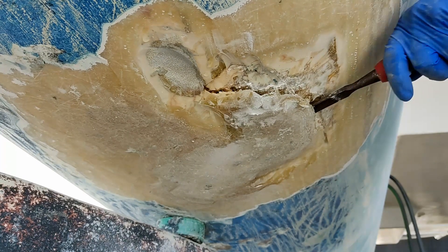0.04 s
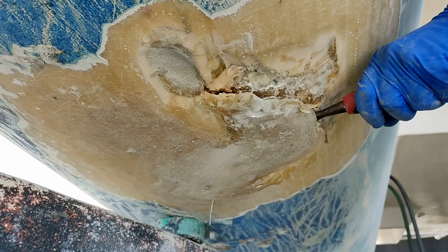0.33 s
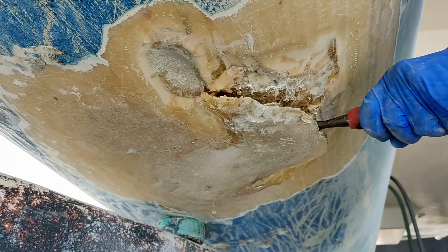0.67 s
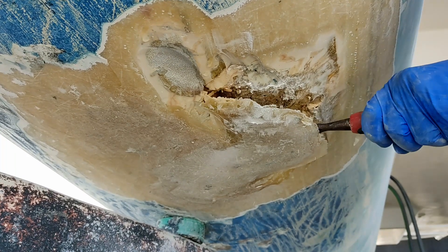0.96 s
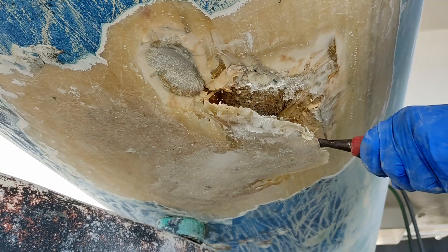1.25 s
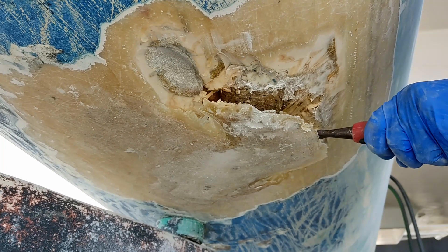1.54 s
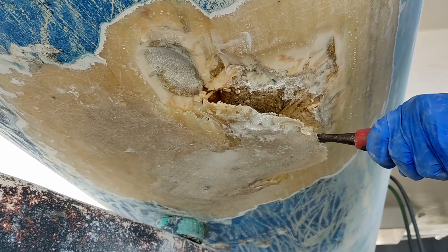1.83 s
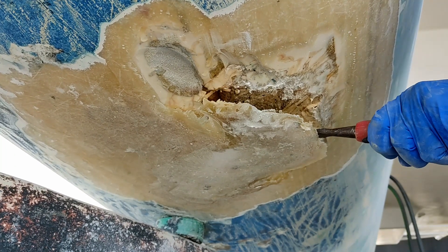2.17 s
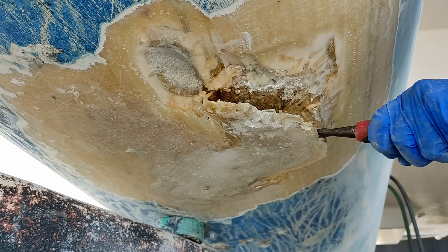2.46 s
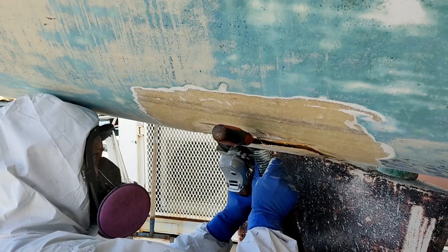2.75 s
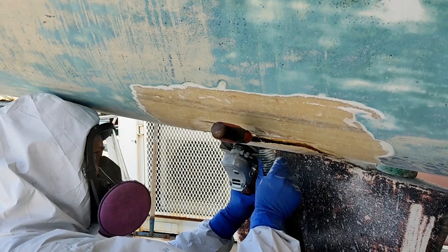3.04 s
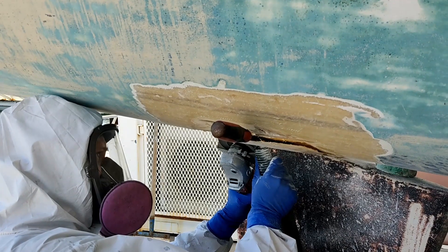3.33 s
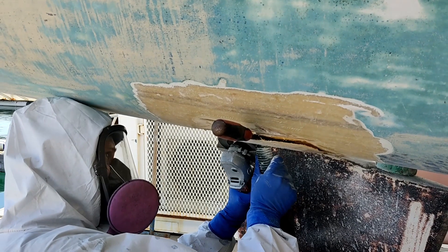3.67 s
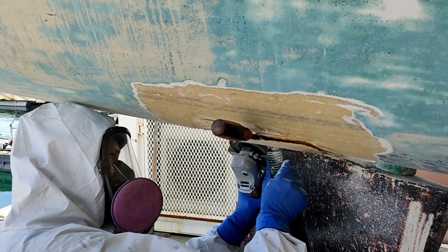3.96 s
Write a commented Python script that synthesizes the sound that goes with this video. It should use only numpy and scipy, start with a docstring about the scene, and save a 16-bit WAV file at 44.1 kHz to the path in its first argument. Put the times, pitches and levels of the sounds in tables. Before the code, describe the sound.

Sharp snaps of fibreglass prised off a boat hull, followed by a rasping, whining grinder.

```python
"""A boatyard, microphone close to the hull. A chisel prises off brittle glass-fibre laminate:
a tear, small snaps, three loud breaks. The cracks ring the hull panel, echo in the yard and overload
the recorder; air buffets the microphone. After a short silence an angle grinder sands the hull,
slowing and whining as it is pressed on."""
import sys
import numpy as np
from scipy import signal
from scipy.fft import rfft, irfft, next_fast_len
from scipy.io import wavfile
from scipy.ndimage import uniform_filter1d, map_coordinates

SR = 44100
rng = np.random.default_rng(int(sys.argv[2]) if len(sys.argv) > 2 else 0)


def transcribe(signal):
    """Save signal, clipped to [-1, 1], as a 16-bit WAV file at the path in sys.argv[1]."""
    frames = np.atleast_2d(signal).T
    limited = np.clip(frames, -1, 1)
    pcm = np.round(limited * 32767).astype(np.int16)
    wavfile.write(sys.argv[1], SR, pcm)


N = 176400
T = np.arange(N) / SR
FFT_SIZE = next_fast_len(N + SR)
HZ = np.fft.rfftfreq(FFT_SIZE, 1 / SR)

# spectra of a fracture and of its splinters (frequency [Hz], gain [dB])
FRACTURE = [(60, -30.5), (250, -13.5), (800, -29.5), (1250, -0.5), (1700, 0.5), (2500, -0.5), (3500, -2),
            (5000, -3), (7000, -14.5), (15000, -36)]
SPLINTERS = [(1000, -36), (3500, 0.5), (5500, 3.5), (8300, -0.5), (10000, -9), (12000, -6), (15500, -11.5)]
# the grinding disc, slower under load (time [s], speed [turns/s])
DISC_SPEED = [(2.57, 168.5), (2.78, 160.3), (2.9, 159), (2.98, 156.6), (3.16, 147.6), (3.25, 144.8),
              (3.33, 146), (3.48, 151.7), (3.55, 153.4), (3.62, 153.9), (3.72, 152.5), (3.82, 149.8),
              (4, 146.5)]


def amp(db):
    """Decibels to gain."""
    return 10 ** (np.asarray(db) / 20)


def unit(x):
    """Scale to rms 1."""
    return x / np.sqrt(np.mean(np.abs(x) ** 2) + 1e-20)


def along(points, hz):
    """Interpolate (frequency, value) points on a log frequency axis."""
    freqs, values = np.transpose(points)
    return np.interp(np.log(hz + 1), np.log(freqs + 1), values)


def curves(rows):
    """One value per sample for each column after the time."""
    times, *columns = np.transpose(rows)
    return [np.interp(T, times, column) for column in columns]


def wobble(rate):
    """A smooth random curve, rate knots a second."""
    coarse = T[::16]
    knots = rng.standard_normal(int(N * rate / SR) + 4)
    return np.interp(T, coarse, map_coordinates(knots, [coarse * rate]))


def filtered(x, response):
    """x through a frequency response."""
    return irfft(rfft(x, FFT_SIZE) * response, FFT_SIZE)[:N]


def colour(points):
    """Causal response of unit power from (frequency [Hz], gain [dB]) points."""
    cepstrum = irfft(np.log(amp(along(points, HZ))), FFT_SIZE)
    cepstrum[1:FFT_SIZE // 2] *= 2
    cepstrum[FFT_SIZE // 2 + 1:] = 0
    return unit(np.exp(rfft(cepstrum)))


def modes(rows):
    """Causal response of unit power from resonances."""
    return unit(sum(amp(db) * 1j * HZ * width / (hz * hz - HZ ** 2 + 1j * HZ * width)
                    for hz, width, db in rows))


def noise(points):
    """Coloured noise of rms 1."""
    return unit(filtered(rng.standard_normal(N), colour(points)))


def grains(rate, spread_db):
    """Random tiny clicks of uneven size, rate a second, rms 1."""
    size = amp(spread_db * np.clip(rng.standard_normal(N), -2, 2))
    return unit((rng.random(N) < rate / SR) * size * rng.choice([-1, 1], N))


def tones(turns, orders, jitter, flutter_db):
    """Slightly unsteady lines on whole multiples of a shaft speed."""
    return unit(sum(amp(db + flutter_db * wobble(14))
                    * np.sin(2 * np.pi * round(k) * turns + jitter * wobble(60)) for k, db in orders))


def add(track, start, x):
    """Mix x into the track at start seconds."""
    part = track[round(start * SR):][:len(x)]
    part += x[:len(part)]


def yard_ambience():
    """The bed of the yard: a low, wavering noise and a faint hiss."""
    # spectra (frequency [Hz], gain [dB])
    air_colour = [(60, -21.5), (135, -1), (165, -7), (270, -5.5), (400, -10.5), (800, -18), (1600, -23.5),
                  (8000, -53)]
    hiss_colour = [(400, -24.5), (1200, -1.5), (3500, 2.5), (7000, -2), (10000, -8.5), (15000, -13)]
    # background treble (time [s], level [dB])
    hiss_levels = [(.5, -58.5), (1.15, -58), (1.27, -66), (1.7, -62.5), (2.1, -67.5), (2.2, -50.5),
                   (2.45, -52)]
    air = amp(-46 + 2.5 * wobble(5)) * noise(air_colour)
    return air + amp(curves(hiss_levels)[0]) * noise(hiss_colour)


def mic_buffet():
    """Moving air rumbles on the microphone."""
    # gusts (time [s], level [dB])
    gusts = [(0, -38.5), (.33, -23), (.5, -35), (1.3, -31), (1.75, -37), (1.95, -19), (2.15, -43.5),
             (2.4, -34.5), (2.7, -60)]
    # their spectrum (frequency [Hz], gain [dB])
    gust_colour = [(6, 9.5), (25, -5), (100, -23), (250, -39.5), (1000, -96.5)]
    return amp(curves(gusts)[0]) * noise(gust_colour)


def laminate_snaps(jolt=0.59, energy_s=0.0023):
    """Each snap is a jolt and a quick run of micro-fractures; fibres crackle and the panel rings."""
    # snaps (time [s], level [dB], t60 [s], relative panel ring [dB], relative splinter treble [dB])
    snaps = [(0.081, -52.5, .012, -13, 6.5), (0.193, -17, 0.016, 4, -3), (0.203, -29.5, 0.011, 14.5, 0),
             (0.215, -24, .006, 4, -4), (.223, -18.5, 0.0037, 4.5, -0.5), (0.268, -32.5, 0.0064, 3, -13),
             (0.694, -22, 0.0076, -21, -20), (.698, -15.5, 0.0085, -15, -10),
             (.730, -21.5, 0.014, -13, -9.5), (.793, -26.5, 0.0038, -28, -12),
             (0.8437, -17.5, 0.004, -35, -11), (0.85, -19.5, 0.073, -15, -6.5),
             (0.9662, -8, 0.006, -17, -11), (0.9688, -2.5, 0.017, -8, -3.5), (.985, -4.5, 0.012, 4.5, -8.5),
             (.997, -20, 0.0096, 8.5, -4.5), (1.009, -18, .006, -12, -7.5),
             (1.029, -20.5, 0.0067, -12, -1.5), (1.350, -21.5, 0.01, -8.5, 7.5),
             (1.353, 3, 0.019, 1, -16.5), (1.359, -13, 0.015, 14, -16), (1.371, -17.5, 0.0071, 12.5, -6),
             (1.387, -22.5, .012, -1.5, 2), (1.392, -3.5, 0.031, -9, -4.5), (1.790, -16.5, 0.0067, 5, -17),
             (1.8193, -11, 0.019, 1.5, -21), (1.822, -15, 0.015, -25, 5), (1.8314, -13, 0.026, -3.5, -12),
             (1.8427, -14.5, .008, -8, -3), (1.849, -17, 0.053, -13, -2.5),
             (1.948, -42.5, 0.0068, -21, 7.5)]
    # showers of parting fibres (time [s], t60 [s], level [dB])
    showers = [(.65, 0.29, -41), (.81, 0.27, -34), (.845, 0.056, -27.5), (.945, 0.24, -30.5),
               (.988, 0.15, -21), (1.326, 0.32, -31), (1.365, 0.15, -23.5), (1.78, 0.13, -20.5),
               (1.81, 0.4, -26.5)]
    # hull panel modes (frequency [Hz], width [Hz], gain [dB])
    panel_modes = [(227, 110, -20.5), (508, 53, -3), (660, 180, -8), (1000, 90, 0), (1093, 240, 5),
                   (1300, 140, -4.5), (1310, 57, -3), (1560, 61, 2.5), (1700, 110, -7.5),
                   (2780, 250, -10.5)]
    fracture, panel, splinters = colour(FRACTURE), modes(panel_modes), colour(SPLINTERS)
    n = SR // 8
    out, t = np.zeros(N), np.arange(n) / SR
    kernels = [irfft(response, FFT_SIZE)[:n] for response in (fracture, panel, splinters)]
    for start, db, t60, ring_db, treble_db in snaps:
        run = rng.standard_normal(n) * rng.exponential(1, n) * amp(-60 * t / t60)
        run /= np.linalg.norm(run)
        run[0] += jolt
        for kernel, part_db in zip(kernels, (0, ring_db, treble_db)):
            part = signal.fftconvolve(run, kernel)[:n]
            # as much energy as this level held for energy_s
            add(out, start, amp(db + part_db) * np.sqrt(energy_s * SR) * part / np.linalg.norm(part))
    shower_level = np.zeros(N)
    for start, t60, db in showers:
        age = np.maximum(T - start, 0)
        rise = np.minimum(age / (0.036 * t60), 1)
        shower_level += rise * amp(db - 60 * age / t60)
    fibres = shower_level * grains(rate=3000, spread_db=7)
    body = unit(fracture + amp(0.5) * panel + amp(-6.5) * splinters)
    return out + filtered(fibres, body)


def yard_echo(x):
    """Close reflections off the hull, and the longer echo of the yard."""
    # decay of the yard (frequency [Hz], t60 [s])
    decay = [(150, 0.68), (1500, 0.68), (5000, 0.63), (9000, 0.42), (15000, 0.83)]
    hz, t, spectrum = signal.stft(rng.standard_normal(SR), SR, nperseg=256)
    tail = signal.istft(spectrum * amp(-60 * t / along(decay, hz)[:, None]), SR, nperseg=256)[1]
    close = grains(rate=2900, spread_db=5) * amp(-60 * T / 0.078) * (T > .002)
    return sum(amp(db) * signal.fftconvolve(x, echo / np.linalg.norm(echo))[:N]
               for echo, db in ((tail, -22.5), (close, -12)))


def fibre_ticks(t60=0.0066):
    """Fibres part with thin, bright ticks: a fine crackle under strain, and a few stray ones."""
    # splintering before the first break, and stray ticks (time [s], relative level [dB])
    strain = [(.5, -69), (.54, -52.5), (.6, -63.5), (.68, -56.5), (.77, -57.5), (.86, -52), (.96, -47)]
    strays = [(.116, -42), (0.741, -37), (1.283, -44.5), (1.479, -41)]
    straining = (T > strain[0][0]) * (T < strain[-1][0])
    out = amp(curves(strain)[0]) * grains(rate=230, spread_db=6.5) * straining
    t = np.arange(SR // 50) / SR
    for start, db in strays:
        add(out, start, 2 * amp(db - 60 * t / t60) * rng.standard_normal(len(t)))
    return filtered(out, colour(SPLINTERS) + .5 * colour(FRACTURE))


def tear(slip_hz=1060, slip_scatter=.19):
    """The flap first rips loose: fibres part in a dense run while it sticks and slips at its own pitch."""
    # course of the rip (time [s], relative level [dB])
    rip = [(.118, -41), (.133, -39), (.14, -22.5), (.151, -31.5), (.158, -22), (.174, -17.5), (.181, -37.5),
           (.187, -27), (.194, -16), (.212, -12.5), (.228, -23), (.265, -31), (.282, -40)]
    # spectrum of the parting fibres (frequency [Hz], gain [dB])
    rip_colour = [(100, -14), (260, 1.5), (480, -5), (800, -1.5), (1500, -10.5), (3100, -14.5), (3800, -21),
                  (8500, -18.5), (10000, -25), (12000, -16.5), (15000, -31.5)]
    # resonances rung by the slips (frequency [Hz], width [Hz], gain [dB])
    slip_modes = [(1057, 194, 0), (3074, 110, -9)]
    level = amp(curves(rip)[0]) * (T > rip[0][0]) * (T < rip[-1][0])
    cycles = np.cumsum(slip_hz * (1 + slip_scatter * wobble(300))) / SR
    slips = np.diff(np.floor(cycles), prepend=0) * amp(3.8 * rng.standard_normal(N))
    ring = unit(filtered(slips, modes(slip_modes)))
    fibres = filtered(level * grains(rate=3500, spread_db=4), colour(rip_colour))
    return amp(-3.5) * fibres + amp(-0.5) * level * ring


def flap_knocks(attack_s=0.00032):
    """Short, hollow knocks as the loosened flap slips on the chisel."""
    # knocks (time [s], level [dB], pitch [Hz], t60 [s])
    knocks = [(0.618, -25, 1800, 0.0047), (.824, -12.5, 1800, 0.014), (0.8436, 0.5, 2290, 0.0033),
              (.920, -5.5, 1930, 0.0043), (.985, -16.5, 220, 0.064), (1.341, -14, 1920, 0.0061),
              (1.4194, 2, 1570, 0.004), (1.784, -15, 1888, 0.0094), (1.7904, 1, 1190, 0.014)]
    out, t = np.zeros(N), np.arange(SR // 8) / SR
    for start, db, hz, t60 in knocks:
        envelope = amp(db - 60 * t / t60) * (1 - np.exp(-t / attack_s))
        add(out, start, envelope * np.sin(2 * np.pi * hz * t))
    return out


def thud(start=.625, hz=68, t60=0.082, attack_s=0.0031):
    """One soft, low thud in the background."""
    age = np.maximum(T - start, 0)
    return amp(-18.5 - 60 * age / t60) * (1 - np.exp(-age / attack_s)) * np.sin(2 * np.pi * hz * age)


def flap_rubs():
    """The loose flap rubs as it settles after each break: a crumbly rustle."""
    # rubs (middle [s], half length [s], relative level [dB])
    rubs = [(1.108, 0.042, -37), (1.53, 0.055, -39), (1.946, 0.031, -46.5)]
    # their spectrum (frequency [Hz], gain [dB])
    rub_colour = [(120, -15), (240, 5), (600, 1), (1750, 0), (2300, -8), (5500, -12.5), (14000, -37)]
    level = sum(amp(db) * np.exp(-((T - middle) / half) ** 2) for middle, half, db in rubs)
    return filtered(level * grains(rate=1500, spread_db=4), colour(rub_colour))


def worn_face(turns, overtones):
    """The scrape that repeats every turn of the disc, slowly changing as the grit wears; rms 1."""
    order = np.arange(1, 106)[:, None]
    angle = np.linspace(0, 1, 2048)
    gain = amp(np.interp(order, *np.transpose(overtones), left=-np.inf))
    worn = np.zeros(N)
    for _ in range(4):
        face = (gain * np.cos(2 * np.pi * (order * angle + rng.random(order.shape)))).sum(0)
        worn += wobble(7) * np.interp(turns % 1, angle, face)
    return worn / np.sqrt(np.abs(uniform_filter1d(worn ** 2, size=len(angle))) + 1e-9)


def abrasion(turns, spectrum, repeat):
    """Grit scraping the hull: the share repeat comes round every turn, the rest is new."""
    repeating = np.sqrt(repeat) * worn_face(turns, [(1, 0)])
    fresh = np.sqrt(1 - repeat) * grains(rate=14000, spread_db=3.5)
    return unit(filtered(repeating + fresh, colour(spectrum))) * amp(1.05 * wobble(29.96))


def disc_chatter(turns, speed):
    """Pressed on, the disc bounces against the hull and buzzes on multiples of its speed."""
    # strength of the bouncing (time [s], relative level [dB])
    levels = [(2.6, -49), (2.78, -40), (2.94, -42), (3.08, -32), (3.24, -31), (3.31, -50), (3.7, -46),
              (3.83, -33.5), (4, -27.5)]
    # its spectrum (frequency [Hz], gain [dB])
    bounce_colour = [(150, -18), (300, -10), (600, -17.5), (1330, -15), (1500, -3), (1620, 7), (1780, 0.5),
                     (1950, -9), (2600, -16), (5000, -17)]
    bounces = [(k, along(bounce_colour, k * speed)) for k in range(1, 33)]
    return amp(curves(levels)[0] + 2) * tones(turns, bounces, jitter=.12, flutter_db=1.5)


def motor_whine(turns, gear_ratio=3.08):
    """The motor whines, turning faster than the disc it drives."""
    # whine (multiple of the motor speed, gain [dB])
    orders = [(1, -21), (2, -7.5), (3, 1)]
    return tones(gear_ratio * turns, orders, jitter=.3, flutter_db=3)


def disc_squeals(turns, sideband_db=-6):
    """Eased off, the disc squeals in step with its rotation; higher squeals are rougher."""
    # squeals (middle [s], half length [s], level [dB], multiple of the disc speed)
    squeals = [(2.85, .1, -41, 41), (2.88, .11, -40, 49), (3.57, .09, -28, 85), (3.63, .11, -39, 92),
               (3.93, .06, -34, 83), (3.59, .1, -33.5, 44), (3.61, .1, -36, 50), (3.6, .13, -40.5, 24)]
    out, highest = np.zeros(N), max(row[3] for row in squeals)
    for middle, half, db, k in squeals:
        side_db = sideband_db + 10 * np.log10(k / highest)
        lines = [(round(k) + j, abs(j) ** .5 * side_db) for j in range(-2, 3)]
        width_hz = .025 * k * DISC_SPEED[-1][1]
        # a narrow band of noise around the pitch
        skirt = np.real((wobble(width_hz) + 1j * wobble(width_hz)) * np.exp(2j * np.pi * turns * k))
        voice = tones(turns, lines, jitter=0.34, flutter_db=3) + .5 * k / highest * skirt
        out += amp(db) * np.exp(-((T - middle) / half) ** 4 / 2) * unit(voice)
    return out


def grinder():
    """The disc rasps, whirrs, chatters and squeals on the hull; the motor whines beneath."""
    # grinding (time [s], relative rasp level [dB], scour level [dB])
    levels = [(2.57, -47.5, -49), (2.6, -32.5, -36.5), (2.66, -30, -34), (2.75, -24, -30),
              (2.9, -24.5, -28), (3.08, -23.5, -27.5), (3.22, -24.5, -29), (3.34, -27, -31),
              (3.44, -25, -29), (3.65, -25, -28), (4, -25, -28.5)]
    # spectra of the midrange rasp and the bright scour (frequency [Hz], gain [dB])
    rasp_colour = [(60, -16.5), (155, -11), (215, -15), (300, -10.5), (800, -10.5), (1100, -7),
                   (1400, -2.5), (1950, -7.5), (2400, -3), (3200, -6.5), (3520, -4.5), (3850, -19.5),
                   (8000, -53.5)]
    scour_colour = [(2500, -19), (3900, 0), (4600, 3), (6500, -2), (8500, -1), (9800, -8.5), (11500, -3.5),
                    (14200, -8), (15200, -9)]
    # overtones of the spinning disc (multiple of the disc speed, gain [dB])
    whirr_orders = [(35, -1.5), (41, 2.5), (51, -12), (58, -2), (65, -19), (77, 4), (83, 2), (90, -1),
                    (99, -13)]
    speed = curves(DISC_SPEED)[0] * (1 + 0.00055 * wobble(25.02))
    turns = np.cumsum(speed) / SR
    rasp_db, scour_db = curves(levels)
    rasp = amp(rasp_db - 1) * abrasion(turns, rasp_colour, repeat=0.17)
    scour = amp(scour_db) * abrasion(turns, scour_colour, repeat=0.27)
    whirr = amp(scour_db - 4.5) * worn_face(turns, whirr_orders)
    chatter = disc_chatter(turns, speed)
    motor = amp(rasp_db - 10) * motor_whine(turns)
    return rasp + scour + whirr + chatter + motor + disc_squeals(turns)


def scene(pause_s=2.455, resume_s=2.568, fade_s=.003):
    """One microphone at the hull: prising, a moment of silence, then grinding."""
    cracks = laminate_snaps() + tear() + flap_knocks() + fibre_ticks() + flap_rubs()
    buffet = mic_buffet()
    prising = cracks + yard_echo(cracks) + yard_ambience() + thud() + buffet
    before = np.clip((pause_s - T) / fade_s, 0, 1)
    after = np.clip((T - resume_s) / fade_s, 0, 1)
    return (prising * before + (grinder() + buffet) * after)[None]


def record(dry, top_hz=16000, edge_hz=400, ceiling=.95):
    """The loudest cracks clip the recorder; nothing is kept above its band limit."""
    band = np.sin(np.pi / 2 * np.clip((top_hz - HZ) / edge_hz, 0, 1)) ** 2
    clipped = np.clip(filtered(dry[0], band), -ceiling, ceiling)
    return filtered(clipped, band)[None]


dry = scene()
out = record(dry)
transcribe(out)
```